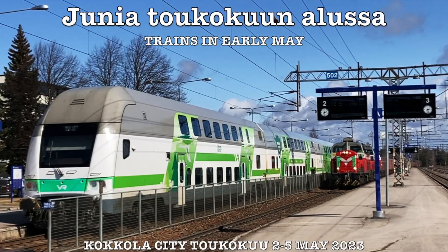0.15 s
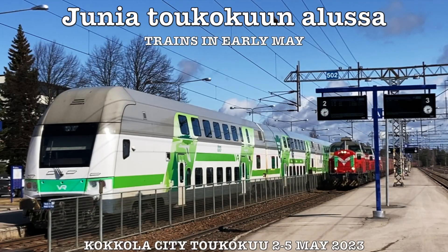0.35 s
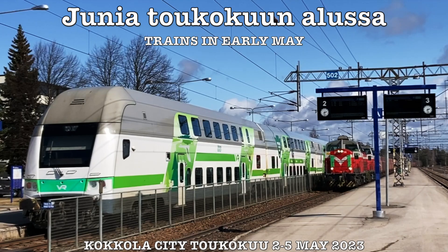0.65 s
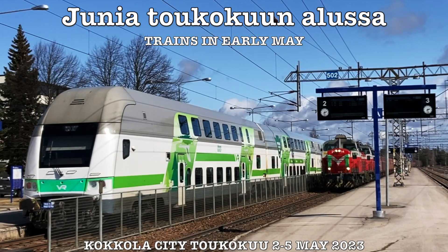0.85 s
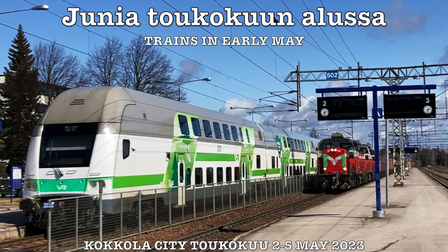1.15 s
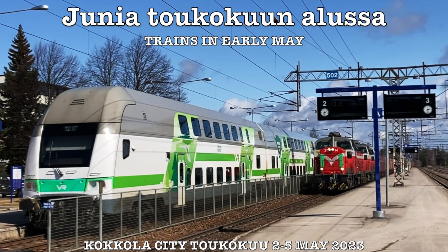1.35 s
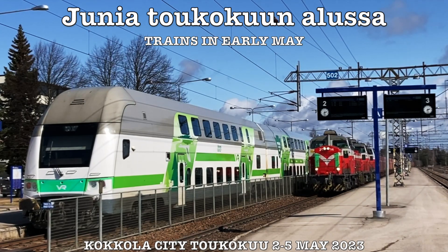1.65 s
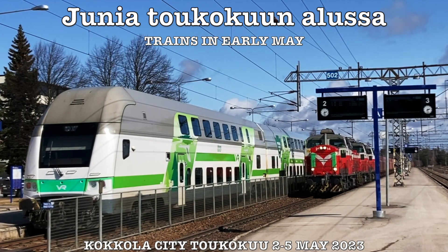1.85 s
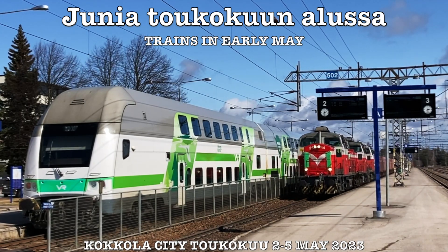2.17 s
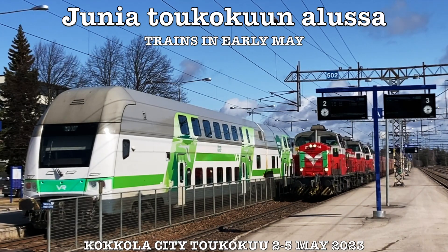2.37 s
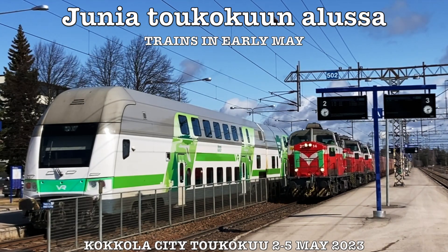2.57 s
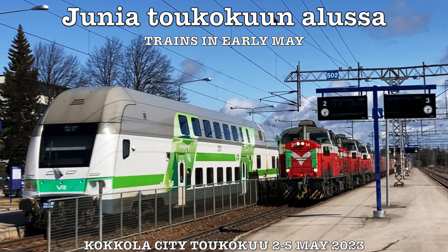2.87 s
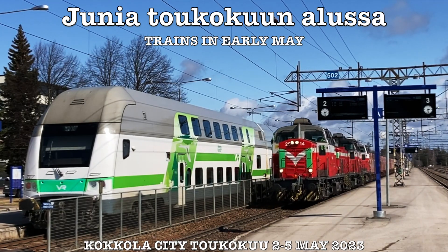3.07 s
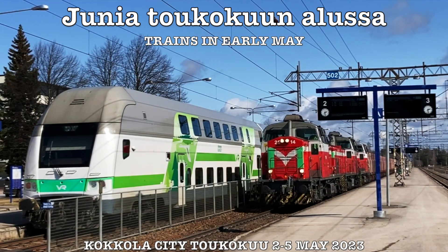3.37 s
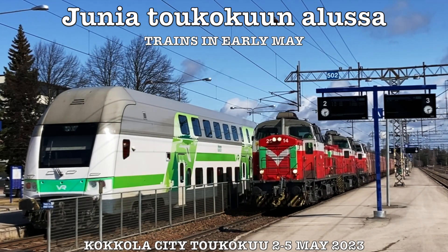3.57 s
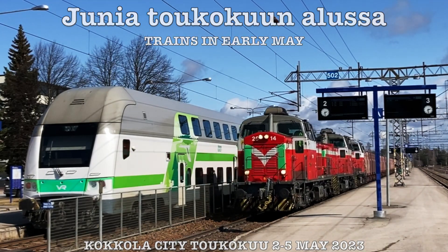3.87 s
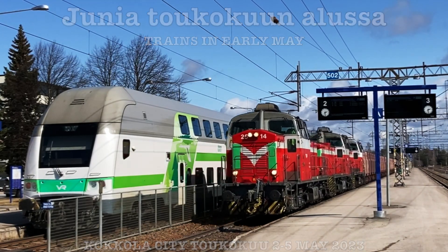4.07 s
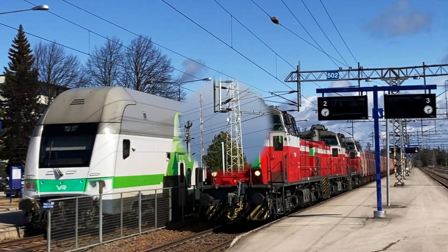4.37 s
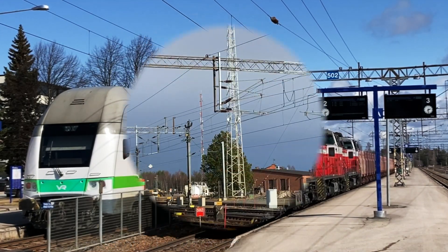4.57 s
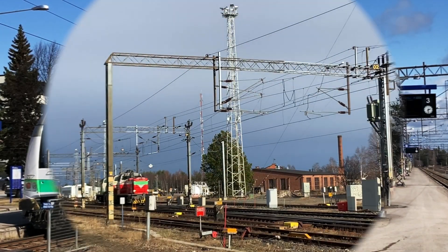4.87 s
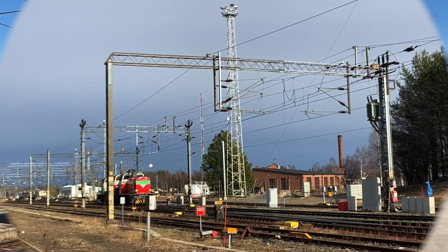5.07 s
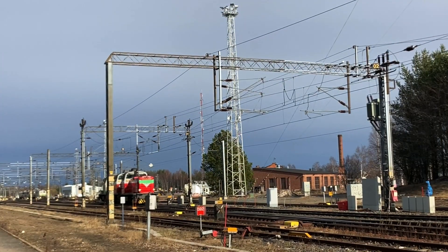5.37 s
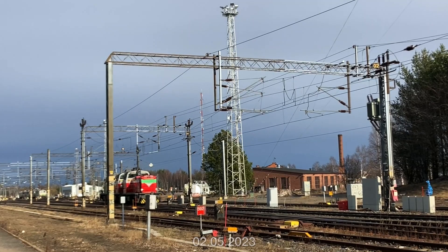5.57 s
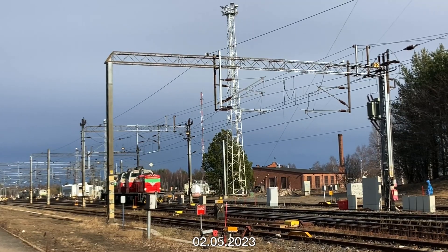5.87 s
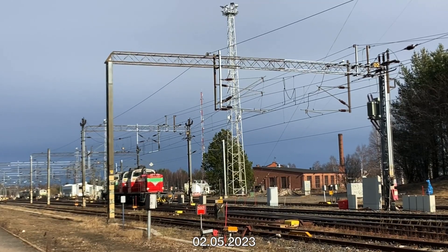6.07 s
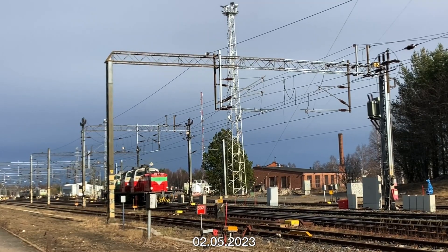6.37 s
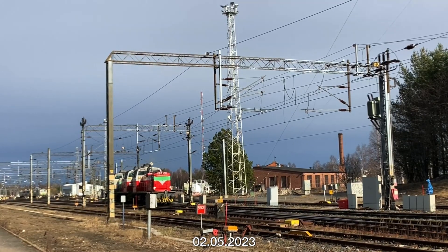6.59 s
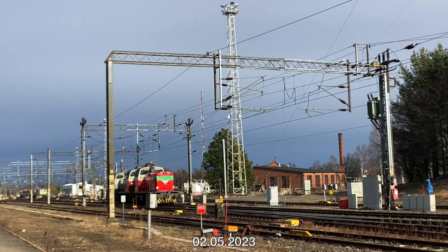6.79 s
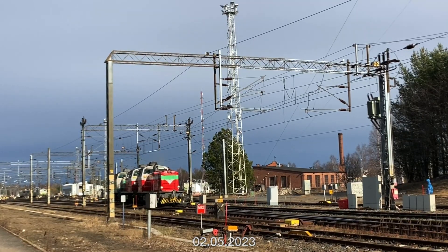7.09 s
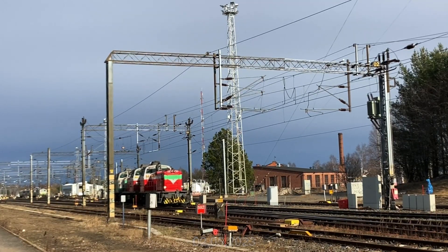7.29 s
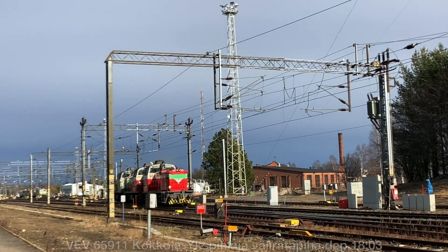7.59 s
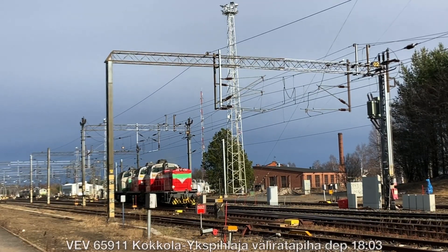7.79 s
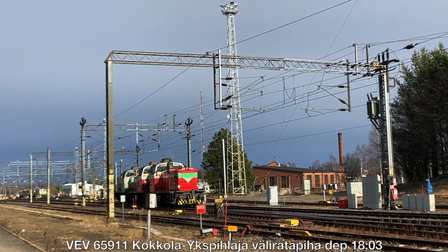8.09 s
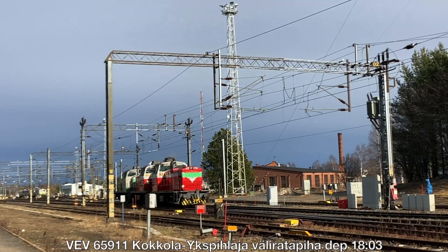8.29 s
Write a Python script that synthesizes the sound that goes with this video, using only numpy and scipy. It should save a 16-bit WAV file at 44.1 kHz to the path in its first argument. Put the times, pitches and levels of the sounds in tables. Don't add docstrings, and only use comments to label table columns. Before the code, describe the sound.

Outdoors at a station platform, coupled diesel locomotives approach with a low, beating rumble, fan roar, singing panels and scattered rod clanks; an air vent hisses early, then shuts. A crossfade leads to a rail yard, where a distant diesel drones with faint turbo whine while wheels knock, scrape and squeal over switches, axles thud, and wind puffs on the stereo microphone.

```python
import sys
import numpy as np
from scipy import signal
from scipy.fft import rfft, irfft, next_fast_len
from scipy.io import wavfile
from scipy.ndimage import uniform_filter1d

SR = 44100
rng = np.random.default_rng(int(sys.argv[2]) if len(sys.argv) > 2 else 0)


def wav_record(signal):
    frames = np.transpose(np.atleast_2d(signal))
    bounded = np.clip(frames, -1, 1)
    quanta = np.round(bounded * 32767).astype(np.int16)
    wavfile.write(sys.argv[1], SR, quanta)


def convert_level_to_amplitude(level_db):
    exponent = np.asarray(level_db, float) / 20
    return 10 ** exponent


N = 372204
T = np.arange(N) / SR
SPAN = next_fast_len(N, real=True)
HZ = np.maximum(np.fft.rfftfreq(SPAN, 1 / SR), 1)
DISSOLVE_S = (4.4, 5.26)


def unit(x):
    return x / np.sqrt(np.mean(x ** 2))


def on_hz(table, hz, column=1):
    rows = np.array(table)
    return np.interp(np.log(hz), np.log(rows[:, 0]), rows[:, column])


def colour(x, gain):
    return irfft(rfft(x, SPAN) * gain, SPAN)[..., :N]


def ring(hz, width_hz):
    return 1 / (1 + 1j * (HZ ** 2 - hz ** 2) / (HZ * width_hz))


def walk(rate_hz):
    k = int(SR / rate_hz)
    steps = np.repeat(rng.standard_normal(N // k + 1), k)
    return 1.58 * uniform_filter1d(uniform_filter1d(steps, k), k)[:N]


def crest(db, at_s, rise_db_per_s, fall_db_per_s):
    return db - np.where(T < at_s, rise_db_per_s, fall_db_per_s) * abs(T - at_s)


# f/Hz, near lag/rad, far lag/rad
PORT_LAG = [(0, 0, 0), (172, .1, -.1), (516, 1.4, -.3), (900, 2, -.4), (1356, 2.45, -.4), (1722, 2.9, -.6),
            (2153, 4, -1), (3014, 5, -1.9), (3700, 6.8, -1), (4737, 9.8, -1.4), (5500, 11.1, -2.6),
            (6352, 12.4, -1.7), (7751, 13.6, 1.1), (16000, 26, 1.1)]


def pair(main, other, ports, lag_column):
    like = np.clip(on_hz(ports, HZ), 0, 1)
    tilt = convert_level_to_amplitude(on_hz(ports, HZ, column=2) / 2)
    lags = np.array(PORT_LAG)
    lag_rad = np.interp(HZ, lags[:, 0], lags[:, lag_column])
    left = colour(main, tilt * np.exp(-1j * lag_rad))
    right = colour(main, like / tilt) + colour(other, np.sqrt(1 - like ** 2) / tilt)
    return np.array([left, right])


def exhaust(cycle_hz, orders, fade_db_per_s, waver, flutter_db):
    turn = 2 * np.pi * np.cumsum(cycle_hz) / SR
    out = np.zeros(N)
    for order in sorted({row[0] for row in orders}):
        tops = [crest(top_db, at_s, fade_db_per_s, fade_db_per_s) for k, top_db, at_s in orders if k == order]
        db = np.max(tops, axis=0) + flutter_db * walk(3.45)
        phase = order * turn + waver * walk(2.545) + rng.uniform(0, 2 * np.pi)
        out += np.sqrt(2) * convert_level_to_amplitude(db) * np.sin(phase)
    return out, turn


def roar(shape, rings, swells_db, beat, flicker_db, edges_hz):
    resonance = 1 + sum((convert_level_to_amplitude(db) - 1) * abs(ring(hz, w)) for hz, w, db in rings)
    gain = convert_level_to_amplitude(on_hz(shape, HZ)) * resonance
    below = [0 * HZ] + [1 / (1 + (HZ / hz) ** 6) for hz in edges_hz] + [1 + 0 * HZ]
    shares = np.sqrt(np.clip(np.diff(below, axis=0), 0, 1))
    levels = [convert_level_to_amplitude(db + flicker_db * walk(9)) for db in swells_db]
    levels[1:] = [level * beat for level in levels[1:]]
    noise = rng.standard_normal((2, len(swells_db), N))
    return [sum(level * colour(n, gain * share) for n, share, level in zip(bands, shares, levels))
            for bands in noise]


def clanks(blows, trim_db, decay_s):
    out, age = np.zeros(N + SR), T[:SR // 10]
    for s, db, hz in blows:
        i = int(s * SR)
        out[i:i + len(age)] += convert_level_to_amplitude(db + trim_db) * np.exp(-age / decay_s) * np.sin(2 * np.pi * hz * age)
    return out[:N]


# t/s, level/dB
GUSTS = [
    (6.56, -34.5),
    (7.08, -28.5),
    (7.65, -31.5),
    (8.44, -29.5),
]
# f/Hz, level/dB
WIND_COLOUR = [(22, -28), (50, 11.5), (150, 6.5), (300, -17), (700, -27), (2000, -104)]


def wind():
    calm_db, rise_db_per_s, fall_db_per_s = -43, 11, 60
    gust_db = np.max([crest(db, s, rise_db_per_s, fall_db_per_s) for s, db in GUSTS], axis=0).clip(calm_db)
    gain = convert_level_to_amplitude(on_hz(WIND_COLOUR, HZ))
    return np.array([convert_level_to_amplitude(gust_db + 2.7 * walk(37)) * unit(colour(rng.standard_normal(N), gain))
                     for _ in range(2)])


def vent():
    shuts_s, drop_db = (0.92, 1.75), -13.5
    level_db = -43 + np.interp(T, shuts_s, (0, drop_db))
    gain = ring(2590, 800) ** 2 + 0.42 * ring(5000, 500) ** 2
    return convert_level_to_amplitude(level_db) * unit(colour(rng.standard_normal(N), gain))


# t/s, level/dB, ring f/Hz, t60/s
THUDS = [(5.839, -21.5, 153, 0.32), (6.169, -21.5, 101.6, 0.28), (6.984, -17.5, 266, 0.11),
         (6.431, -18, 151, 0.15), (5.997, -16.5, 98, 0.33), (6.57, -10.5, 77, 0.2),
         (6.975, -17.5, 156, 0.16), (7.073, -5, 73, 0.11), (7.22, -17, 153, 0.18), (7.462, -23, 101, 0.15),
         (7.631, -16.5, 190.4, 0.31), (7.72, -18, 200, 0.12), (7.762, -6.5, 80.5, 0.055),
         (7.911, -19.5, 71, 0.27), (8.027, -14, 173.4, 0.27), (8.336, -41, 106, 0.083),
         (8.419, -18.5, 200, 0.16)]


def thuds():
    start_hz, glide_s, rise_s = 200.5, 0.011, 0.0096
    out, age = np.zeros(N + SR), T[:SR // 2]
    for s, db, hz, t60 in THUDS:
        turn = 2 * np.pi * np.cumsum(hz + (start_hz - hz) * np.exp(-age / glide_s)) / SR
        swell = (1 - np.exp(-age / rise_s)) * np.exp(-np.log(1000) * age / t60)
        i = int(s * SR)
        out[i:i + len(age)] += convert_level_to_amplitude(db) * swell * np.sin(turn)
    return out[:N]


# t/s, level/dB, f/Hz, half length/s
SQUEALS = [(5.93, -54, 1560, .015), (6.065, -46.5, 1500, .01), (6.08, -51, 2390, .012),
           (6.305, -53, 2380, .018), (6.315, -54, 4450, .012), (6.405, -55, 2400, .02),
           (6.42, -49, 1575, .022), (6.35, -55, 4280, .01), (6.42, -56, 4330, .03), (6.5, -56, 4200, .008),
           (5.87, -53, 1300, .008), (7.3, -49, 4470, .014), (7.325, -52, 4350, .012),
           (7.617, -52, 4370, .016), (7.64, -51, 3600, .012), (7.657, -43, 4395, .016),
           (7.699, -37.5, 4385, .013), (7.7, -46, 4165, .012), (7.695, -51, 3560, .012),
           (7.7, -49, 2390, .02), (7.724, -42.5, 4330, .007), (7.72, -48, 4190, .007),
           (7.72, -52, 3700, .012), (7.742, -49, 4360, .009), (8.04, -43, 1450, .009),
           (8.043, -43, 990, .012), (8.05, -43, 700, .014), (8.05, -42, 520, .015),
           (8.058, -44, 1520, .007), (8.132, -44, 1300, .006), (7.66, -53, 5500, .008),
           (7.635, -54, 5800, .006), (7.725, -54, 5400, .01), (8.14, -53, 4330, .02)]


def squeals():
    trim_db, reach_s = 3.5, .1
    out, unsteady = np.zeros(N), np.cumsum(22 * walk(70)) / SR
    for s, db, hz, half_s in SQUEALS:
        now = slice(int((s - reach_s) * SR), int((s + reach_s) * SR))
        swell = np.exp(-((T[now] - s) / half_s) ** 2)
        tone = np.sin(2 * np.pi * (hz * T[now] + unsteady[now]))
        out[now] += np.sqrt(2) * convert_level_to_amplitude(db + trim_db) * swell * tone
    return out


# t/s, scrape level/dB, ring over scrape/dB, favoured f/Hz, length/s
FROGS = [(5.626, -47, -6, 2400, 0.11), (5.75, -58, -12, 2400, 0.091), (5.907, -48, -10, 1950, 0.033),
         (5.918, -41.5, -11, 1950, 0.079), (6.014, -41, -1, 2800, 0.062), (6.072, -38.5, -4, 2200, 0.081),
         (6.243, -39, 5, 2820, 0.028), (6.285, -38, 3.5, 3200, 0.077), (6.371, -36.5, 3, 2400, 0.074),
         (6.46, -45, -0.5, 1490, 0.14), (6.808, -44.5, -6, 3600, .05), (6.986, -37, -19, 2080, 0.011),
         (7.161, -39.5, -11, 2200, 0.04), (7.27, -49, -2, 3580, 0.038), (7.284, -36, -1.5, 4400, 0.043),
         (7.606, -44.5, 8.5, 4400, .07), (7.632, -38, -7, 3970, 0.085), (7.68, -35.5, -5, 3500, 0.048),
         (7.825, -43, -4, 3630, 0.024), (7.706, -41, -3, 4200, 0.026), (8.034, -27.5, -6, 1380, 0.06),
         (8.064, -48, -12, 2900, .044), (8.104, -31, -6, 3800, 0.044), (8.128, -35.5, -7, 1600, 0.023),
         (8.154, -58, 0, 2050, 0.044), (8.378, -37.5, -4, 1450, 0.11), (8.415, -41, -19, 1610, 0.048)]
# f/Hz, width/Hz
WHEEL_MODES = [
    (1565, 130),
    (2380, 150),
    (4370, 120),
]
# f/Hz, level/dB
SCRAPE = [(150, 19.5), (600, 8), (1500, 6), (2400, 14.5), (2900, -26), (3500, 9), (4500, 3.5), (5500, -1.5),
          (8000, -9.5), (12500, -29), (15500, -50)]


def frogs():
    fall_db_per_octave, squeal_rise_s = 18, .018
    drive, age = np.zeros((4, N)), T[:SR // 2]
    for s, db, ring_db, hz, length_s in FROGS:
        rings_db = ring_db - fall_db_per_octave * abs(np.log2(np.array(WHEEL_MODES)[:, 0] / hz))
        grind = np.exp(-(age / length_s) ** 2)
        blow, yard_echo = .4 * np.exp(-age / .012), .12 * np.exp(-age / .06)
        shape = (1 - np.exp(-age / .003)) * (blow + grind + yard_echo)
        squeal = (1 - np.exp(-age / squeal_rise_s)) * grind
        levels = convert_level_to_amplitude(db + np.array([0, *rings_db]))[:, None]
        i = int(s * SR)
        drive[:, i:i + len(age)] += (levels * [shape, shape, squeal, squeal])[:, :N - i]
    gains = [convert_level_to_amplitude(on_hz(SCRAPE, HZ))] + [ring(hz, w) ** 2 for hz, w in WHEEL_MODES]
    gains[1] = gains[1] + .55 * ring(1150, 1300) ** 2
    gains[3] = gains[3] + 0.24 * ring(3750, 800) ** 2
    gains = [g / np.sqrt(np.mean(abs(g) ** 2)) for g in gains]
    grit = convert_level_to_amplitude(1.7 * walk(170))
    trims = convert_level_to_amplitude(np.array([-5.5, -2.5, -4.5, -6.5]))
    return [sum(trim * colour(d * grit * rng.standard_normal(N), g) for d, g, trim in zip(drive, gains, trims))
            for _ in range(2)]


def rattle():
    rest_db, spread_s = -44, .07
    shake = sum(convert_level_to_amplitude(db - rest_db) * np.exp(-((T - s - length_s) / spread_s) ** 2)
                for s, db, _, _, length_s in FROGS)
    return np.log1p(shake)


def turbo():
    start_hz, spool_hz_per_s = 4380, 112
    throttle_off_s, drop_db = (6.9, 7.1), -13
    hz = start_hz + spool_hz_per_s * (T - DISSOLVE_S[0])
    db = -62 + np.interp(T, throttle_off_s, (0, drop_db))
    return convert_level_to_amplitude(db + 1.7 * walk(8.3)) * np.sin(2 * np.pi * np.cumsum(hz + 5 * walk(30)) / SR)


# order of the cycle rate, level/dB, loudest t/s
FAR_ORDERS = [(3, -39, 6), (3, -36.5, 7.5), (3, -36.5, 8.3), (4, -40, 10.5), (6, -36.5, 6.5),
              (6, -33.5, 4.8)]
# f/Hz, level/dB per Hz
FAR_ROAR = [(22, -76), (45, -35), (180, -44.5), (300, -50.5), (700, -57.5), (850, -61), (1300, -60.5),
            (2400, -67.5), (2900, -70), (3400, -72), (4550, -73.5), (5000, -79), (8500, -89.5),
            (15500, -122)]
# f/Hz, width/Hz, level over roar/dB
FAR_RINGS = [
    (690, 3.5, 5.6),
    (2350, 60, 4),
    (2900, 450, -5),
]
# level/dB, growth/(dB/s), rattle share/dB
FAR_BANDS = [
    (-2.5, -0.4, 2),
    (-1.5, 0.67, 0.5),
    (-2, 2, 1.5),
    (-4.5, 1, 5.5),
    (-7.5, 3.5, 3.5),
]
# t/s, level/dB, ring f/Hz
SLAMS = [(8.031, -23, 1000), (8.0335, -23, 1800), (8.0365, -19, 1400), (8.0405, -22, 900),
         (8.045, -23, 1200), (8.049, -19, 620), (8.0565, -19.5, 1500), (8.0625, -24, 1300),
         (8.079, -25, 2310), (8.121, -29, 2190), (8.131, -28, 1310)]
# f/Hz, likeness 0-1, left minus right/dB
FAR_PAIR = [(60, .98, -1.5), (260, .8, -.2), (600, .88, .4), (880, .77, 2), (1200, .83, 1.7),
            (1720, .46, 2.6), (2500, .68, .8), (3000, .3, .6), (3500, .55, 2.4), (4300, .7, -2),
            (4900, .56, -.6), (5700, .75, -2), (7000, .7, .8)]


def far_train():
    cycle_hz, midyard_s = 16.9, 6.8
    drone, turn = exhaust(np.full(N, cycle_hz), FAR_ORDERS, fade_db_per_s=3.5, waver=0.73, flutter_db=2.5)
    shake = rattle()
    bands_db = [db + growth * (T - midyard_s) + share_db * shake for db, growth, share_db in FAR_BANDS]
    main, other = roar(FAR_ROAR, FAR_RINGS, bands_db, beat=1 + 0.027 * np.sin(turn), flicker_db=.8,
                       edges_hz=(220, 1000, 2900, 4800))
    knock, echo = frogs()
    slams = clanks(SLAMS, trim_db=-1.0, decay_s=0.0014)
    direct = drone + turbo() + squeals() + thuds() + slams + knock
    return pair(direct + convert_level_to_amplitude(32) * main, echo + convert_level_to_amplitude(31.5) * other, FAR_PAIR, lag_column=2)


# t/s, lead f/Hz, trailing f/Hz, third f/Hz
REVS = [
    (0, 11.1, 12.83, 15.4),
    (2.5, 11.03, 12.72, 15.35),
    (5.2, 10.95, 12.62, 15.3),
]
# order of the cycle rate, level/dB, loudest t/s
LEAD_ORDERS = [(5, -33.5, 2.9), (5, -32, 4), (5, -38, .5), (6, -28.5, .4), (6, -29.5, 1.1), (6, -29.5, 1.9),
               (6, -30.5, 2.8), (8, -37, 1), (8, -35, 2.1), (8, -32, 3.4), (9, -31, 4.4), (9, -32, 3.75),
               (9, -34, 2.1), (9, -35, 3), (10, -38, 2.3), (10, -37, 4), (11, -35.5, 1), (11, -38, 2),
               (11, -36.5, 3.45), (12, -38, 2.2), (15, -38, 4.4), (16, -39, 3.2), (25, -42, .3),
               (29, -42, 3.2), (32, -42, 4.2), (37, -41, 1.2), (37, -42, 2.1)]
TRAIL_ORDERS = [(4, -33, .6), (4, -31, 1.8), (4, -33, 2.8), (4, -33.5, 3.8), (5, -35, 1.3), (6, -30, 1.2),
                (6, -35, 2.6), (6, -28.5, 4.3), (8, -35, 4.4), (10, -38, 1.4), (12, -38, 4.4)]
THIRD_ORDERS = [(3, -36, .9), (3, -36.5, 3.1), (3, -37, 4), (5.5, -36, 1), (5.5, -35.5, 2.1), (6, -34, 1.6),
                (6, -35, 2.4), (7.3, -36.5, 2.5), (8.9, -36, .4), (8.9, -37, 1.4), (8.9, -37, 3.5)]
# f/Hz, level/dB per Hz
NEAR_ROAR = [(22, -58), (34, -53), (50, -35.5), (110, -41), (150, -43), (220, -48.5), (300, -45.5),
             (550, -49), (1300, -52), (1900, -60.5), (3000, -66.5), (6000, -76.5), (10000, -80.5),
             (15500, -89)]
# level at the turn/dB, turn t/s, rise before it/(dB/s), fall after it/(dB/s), negative where it
NEAR_BANDS = [
    (2.3, 5, 0.86, 1),
    (1.8, 0.41, .6, 0.56),
    (0.79, 2.6, 1.1, -0.13),
    (0.62, 1.25, 0.38, -0.64),
    (.7, 0.63, 4.3, -0.43),
]
# t/s, lift/dB
ROAR_LIFTS = [
    (.273, 1.5),
    (1.413, 3),
    (2.153, 2.5),
]
# f/Hz, width/Hz, level/dB, loudest t/s, fade/(dB/s)
PANELS = [(257, 16, -1.5, 0.21, 10), (317, 76, -4, 3.6, 7.5), (303, 29, -2, 7.1, 13.5),
          (407, 8.9, 9.5, 1.14, 11.5), (451, 9.2, 6, 0.86, 10), (434, 29, 8.5, 4.5, 9.5),
          (670, 42, 2.5, 0.18, 5.5), (670, 50, 0.5, 4.1, 5.5), (915, 14, 1.5, 5.8, 3),
          (670, 7.2, 12, 1.8, 22), (752, 15, 8, 0.73, 9.5), (776, 19, 3.5, 2.1, 7.5),
          (1103, 75, 4.5, 2, 11), (962, 94, 1.5, 3.1, 5.5), (1280, 13, 4, 0.82, 18),
          (2166, 37, 3.5, 0.56, 2.5), (2400, 27, 5, 1.8, 2.5), (2800, 170, 4.5, .8, 8),
          (3130, 120, 1.5, 1.34, 6), (3500, 220, 1, 2, 18), (3100, 90, -2, 4.05, 13), (3840, 11, 8, .7, 1),
          (3840, 9.4, 13.5, 1.9, 16), (3895, 8.4, 5, 2.8, 7), (3900, 6.5, 18, 4.2, 12),
          (4195, 70, 2, 1.6, 2.5)]
# t/s, level/dB, ring f/Hz
SHORT_KNOCKS = [(0.247, -21, 541), (0.273, -21, 764), (0.724, -14, 595), (1.413, -23, 754), (1.874, -17, 711),
                (2.154, -25, 700), (2.346, -29, 773), (2.52, -19, 842), (2.686, -25, 751), (3.222, -23, 678),
                (3.358, -20, 686), (4.087, -17, 580), (4.249, -12, 915)]
# f/Hz, likeness 0-1, left minus right/dB
NEAR_PAIR = [(60, .975, -4), (260, .88, -3), (500, .82, -2.9), (800, .79, -3.6), (1100, .75, -3.1),
             (1360, .82, -1.3), (1720, .68, -.7), (2150, .42, -2), (3000, .44, .3), (3900, .32, 1),
             (4700, .2, .5), (5700, .22, -.3), (6350, .55, .2), (7750, .65, .1)]


def near_engines():
    s, *cycle_hz = np.transpose(REVS)
    engines = [exhaust(np.interp(T, s, hz), orders, fade_db_per_s=3.5, waver=.25, flutter_db=.8)
               for hz, orders in zip(cycle_hz, (LEAD_ORDERS, TRAIL_ORDERS, THIRD_ORDERS))]
    lead_turn = engines[0][1]
    lift_decay_s = 0.011
    knocks = convert_level_to_amplitude(sum(db * (T > at_s) * np.exp(-abs(T - at_s) / lift_decay_s) for at_s, db in ROAR_LIFTS))
    both = np.array(roar(NEAR_ROAR, [], [crest(*row) for row in NEAR_BANDS],
                         beat=knocks * (1 + 0.035 * np.sin(lead_turn)), flicker_db=0.5,
                         edges_hz=(220, 800, 1600, 5600)))
    singing = 0
    for hz, width_hz, db, at_s, fade in PANELS:
        level = convert_level_to_amplitude(crest(db, at_s, fade, fade) + 2.0 * walk(12) - 1.5)
        singing = singing + level * signal.lfilter(*signal.iirpeak(hz, hz / width_hz, SR), both)
    both = both + singing
    hollow = np.interp(T, (.95, 1.1), (.62, 0))
    main, other = convert_level_to_amplitude(33) * (both - hollow * colour(both, ring(4550, 650)))
    drone = convert_level_to_amplitude(.4) * sum(out for out, _ in engines)
    short_knocks = clanks(SHORT_KNOCKS, trim_db=-2.0, decay_s=.004)
    return pair(drone + vent() + short_knocks + main, other, NEAR_PAIR, lag_column=1)


def scene():
    mix = np.interp(T, DISSOLVE_S, (0, 1))
    return (1 - mix) * near_engines() + mix ** 0.32 * (far_train() + wind())


def roll_off(x):
    return signal.sosfilt(signal.butter(12, 17090, fs=SR, output="sos"), x)


def record(dry):
    top_hz = 15720
    no_mid_edges_hz, no_side_edges_hz = [8290, 9700, 12800, 14400], [10400, 12300, 14800]
    left, right = rfft(dry, SPAN) * (HZ < top_hz)
    mid, side = (left + right) / 2, (left - right) / 2
    no_mid = np.searchsorted(no_mid_edges_hz, HZ) % 2 == 1
    no_side = np.searchsorted(no_side_edges_hz, HZ) % 2 == 1
    fleck_band = np.searchsorted((8290, 8720), HZ) == 1
    fleck = irfft(.6 * mid * fleck_band, SPAN)[:N] * np.clip(4 * (walk(22) - .85), 0, 1)
    mid, side = np.where(no_side, left, mid * ~no_mid), np.where(no_mid, left, side * ~no_side)
    side = side * convert_level_to_amplitude(-9 * np.exp(-((HZ - 6950) / 550) ** 4))
    mix = irfft(np.array([mid + side, mid - side]), SPAN)[:, :N] + fleck
    return roll_off(mix)


dry = scene()
out = record(dry)
wav_record(out)
```